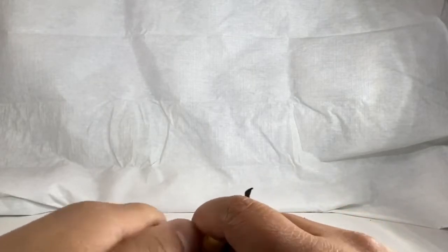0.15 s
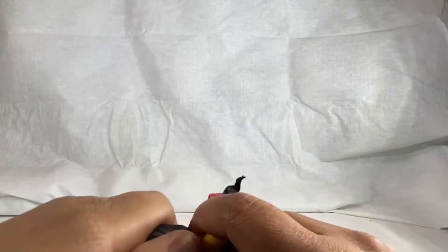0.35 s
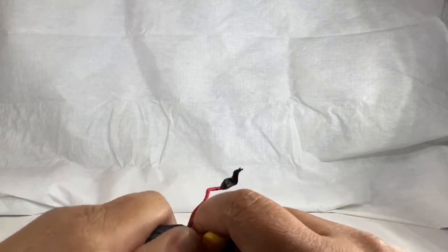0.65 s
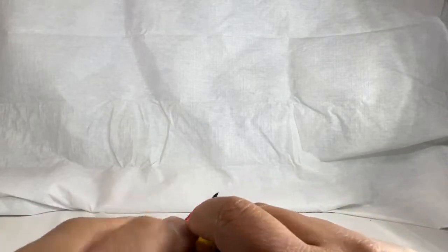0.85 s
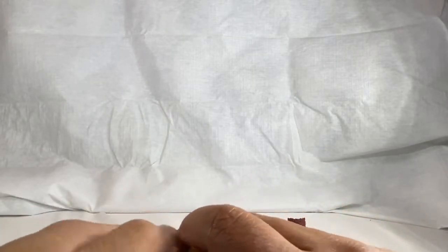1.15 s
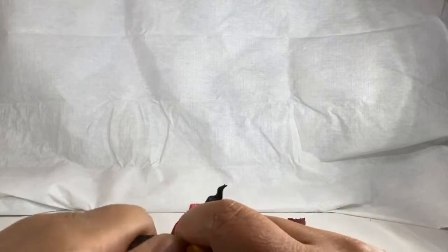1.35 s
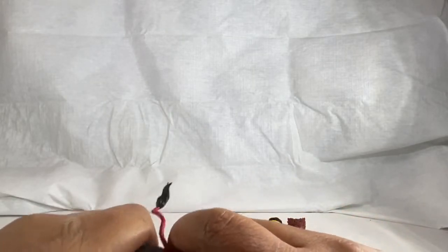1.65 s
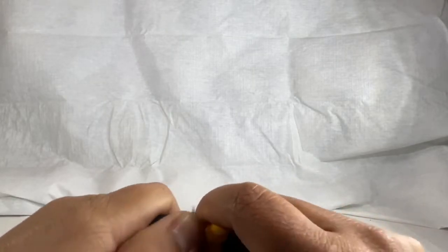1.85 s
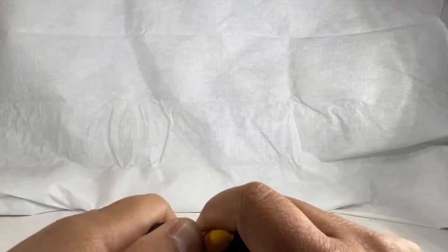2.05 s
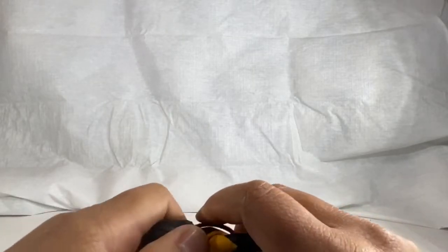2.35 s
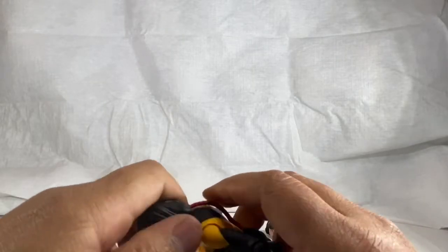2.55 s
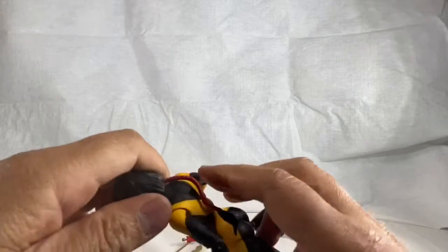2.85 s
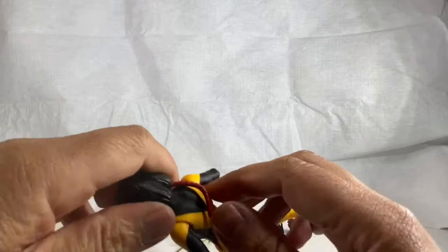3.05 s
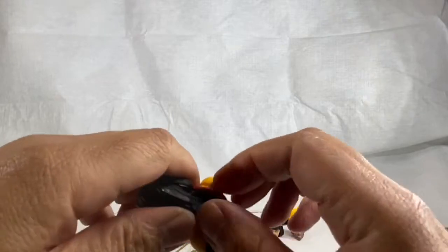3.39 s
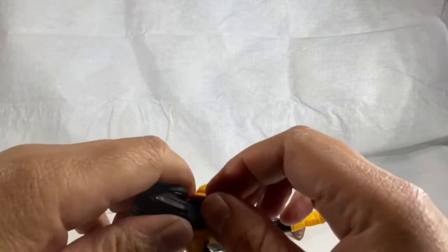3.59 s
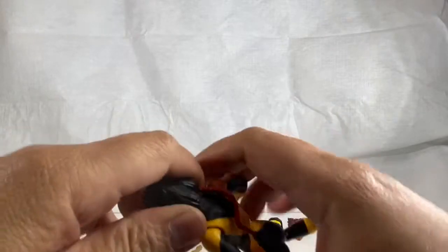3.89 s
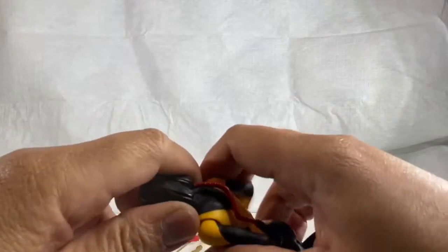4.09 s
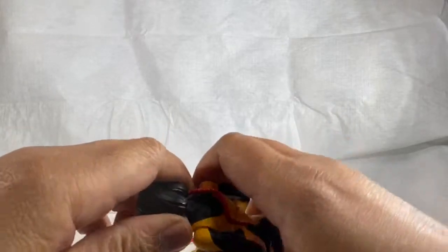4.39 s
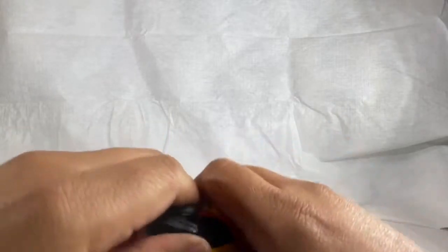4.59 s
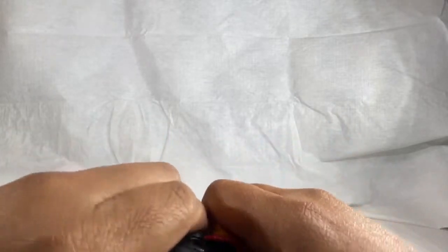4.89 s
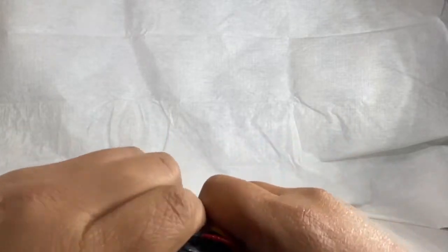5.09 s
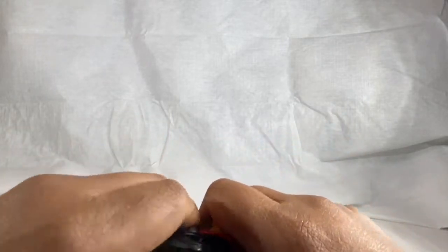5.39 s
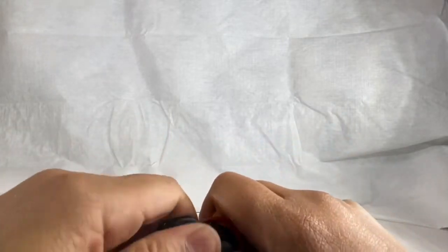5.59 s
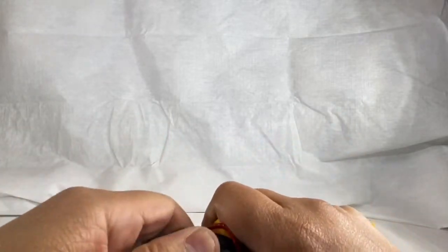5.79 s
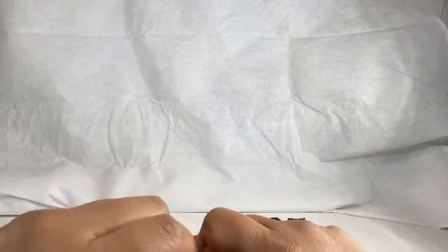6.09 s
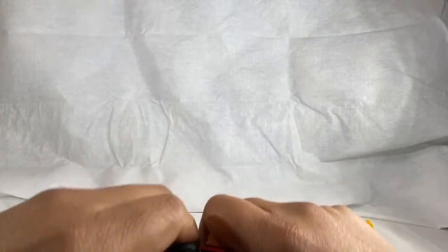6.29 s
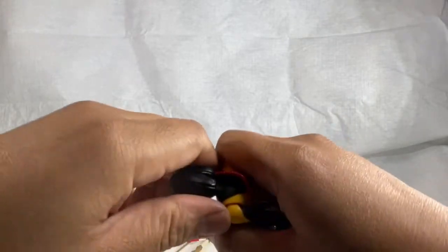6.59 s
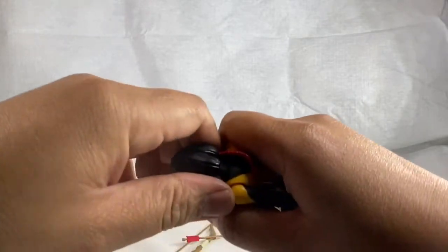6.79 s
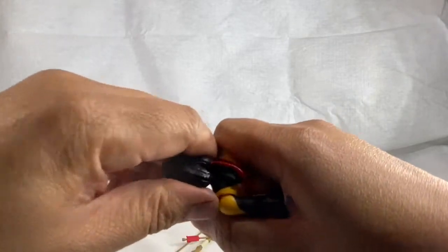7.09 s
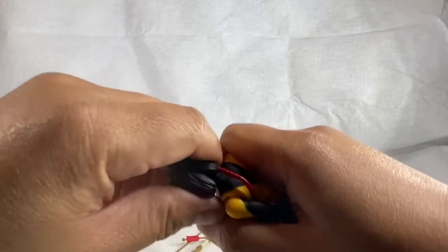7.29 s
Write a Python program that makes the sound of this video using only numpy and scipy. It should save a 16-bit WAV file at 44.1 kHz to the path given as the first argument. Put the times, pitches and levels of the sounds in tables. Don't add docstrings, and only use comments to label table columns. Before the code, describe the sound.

Dry plastic snaps and tiny ticks from a small jointed figure being worked by hand, two dull knocks, one very loud crack, faint indoor hum.

```python
import sys
import numpy as np
from scipy import signal
from scipy.fft import rfft, irfft
from scipy.io import wavfile
from scipy.ndimage import uniform_filter1d

SR = 44100
rng = np.random.default_rng(int(sys.argv[2]) if len(sys.argv) > 2 else 0)


def boost(x):
    u = np.asarray(x, float) / 20
    return 10 ** u


def to_wav(sig):
    pcm = np.clip(np.atleast_2d(sig), -1, 1) * 32767
    pcm = np.round(pcm).astype(np.int16)
    wavfile.write(sys.argv[1], SR, pcm.T)


N = 328545

# frequency in Hz, level in dB per Hz.
HUM_SPECTRUM = [(15, -58), (25, -24), (49, -5), (90, -3.5), (121, -7), (197, -4), (259, -7), (339, -3.5),
                (410, -8), (687, -11.5), (1510, -17), (10700, -29), (16500, -45)]
HUM_DB = -65.5
# time in seconds, level in dB.
MURMUR_SWELL = [(0.0, -72), (3.11, -82), (6.12, -67), (6.49, -86), (7.45, -79)]
MAINS_HZ, MAINS_DB = 58.4, -79.5

# peak time in seconds, half length in seconds,
# rub through the shell in dB, dry skin hiss in dB.
STROKES = [(0.064, 0.069, -56.5, -66), (.25, 0.034, -72, -74), (0.344, 0.031, -59, -71),
           (.40, 0.027, -69, -73), (0.883, .2, -65, -72), (1.13, 0.036, -55, -82), (1.206, .06, -58, -70),
           (2.427, .07, -69, -67), (2.543, 0.11, -73.5, -63.5), (2.682, 0.064, -66.5, -66),
           (2.744, 0.063, -60.5, -68.5), (2.809, 0.022, -56.5, -64), (2.971, 0.022, -73, -70),
           (3.018, 0.026, -63.5, -62), (3.131, 0.086, -62.5, -65.5), (3.246, 0.04, -74, -63),
           (3.39, 0.092, -64, -68), (3.487, 0.034, -67.5, -59.5), (3.585, 0.079, -80.5, -68.5),
           (3.805, 0.087, -63, -64), (3.97, 0.16, -66.5, -63.5), (4.072, 0.024, -67, -59),
           (4.235, 0.054, -65, -59), (4.38, 0.072, -57.5, -63), (4.465, .1, -60, -58),
           (4.878, 0.13, -64, -66), (5.014, 0.094, -62, -66.5), (5.293, 0.13, -62.5, -72),
           (5.961, 0.071, -67, -71.5), (6.252, 0.13, -70, -66.5)]
STROKE_FALL_DB = 19.5
# time in seconds, rub level in dB.
PRESSURE = [(0, -75.5), (.2, -61.5), (.45, -78), (.59, -95), (.66, -69), (1.07, -72), (1.3, -66),
            (1.67, -85), (1.75, -72.5), (1.91, -72), (1.97, -80), (2.32, -74.5), (5.2, -82), (5.53, -71),
            (6.76, -86), (6.81, -67.5), (6.95, -79), (7.45, -87)]
SKIN_DB, SKIN_SHARE = -77, 0.4
# frequency in Hz, level in dB.
SKIN_SPECTRUM = [(1200, -17), (3000, -0.5), (7000, 1.5), (10000, 1), (14000, -1), (16500, -10.5)]
# time in seconds, frequency in Hz.
GRIP = [(.05, 2796), (.3, 3700), (1.15, 3700), (2.3, 5330), (2.7, 4005), (2.82, 5700), (3.1, 4670),
        (3.4, 4480), (3.8, 3430), (4.4, 5700), (4.9, 5300), (5.3, 3130), (5.9, 3960), (6.8, 4715),
        (7.45, 4710)]

# frequency in Hz, width in Hz, level in dB.
SHELL_MODES = [(1300, 630, -10.5), (2730, 1600, 2.5), (3700, 570, 3), (4680, 1100, 2.5), (5700, 740, 4),
               (6960, 1300, -9.5)]
# start in seconds, peak
# in dB, ring in Hz, snap in dB.
TICKS = [(0.042, -41.5, 2820, -18), (0.149, -30, 5020, 0), (0.1883, -42, 5640, -10), (0.21, -47, 2430, -8),
         (0.3409, -36, 3790, -9), (0.4238, -46, 3670, -6), (0.4363, -43, 6450, -10),
         (0.46, -35.5, 3850, -2), (0.5213, -48.5, 2370, -6), (0.528, -44, 6360, -1),
         (0.863, -48.5, 5510, -5), (0.9844, -47, 3500, -27), (1.2815, -48, 3770, -16),
         (1.3917, -55, 6160, -1), (1.4494, -47, 8570, 3), (1.6534, -49.5, 2460, 1),
         (1.7375, -34.5, 2810, 8.5), (2.0283, -35, 5800, -4), (2.0949, -48.5, 4114, 15),
         (2.7511, -50, 4950, -7), (3.9524, -43.5, 6100, 5), (4.0804, -43, 3540, -27),
         (4.9015, -50.5, 5450, -5), (5.105, -55, 4230, -10.5), (5.8244, -45.5, 4820, -1),
         (5.8534, -36, 5600, -3), (5.8942, -33.5, 5470, -22), (5.4562, -49.5, 5490, -19.5),
         (6.304, -52, 3790, 3), (7.0937, -37, 3250, -5)]
PEG_HZ, BALL_HZ, SOCKET_HZ = 13850, 9570, 7900
PEG_SLIPS = [(0.0995, -14.5, 5570, -7, -3.5), (0.1378, -16, 5460, -10.5, -6.5),
             (0.3876, -36.5, 6280, -14, -17.5), (0.4472, -22.5, 6000, -19.5, -8.5),
             (0.992, -26, 5840, -17, -2), (1.02, -31, 3660, -12, -13.5), (1.2043, -20, 6000, -11, 2.5),
             (1.2221, -20, 5500, -6.5, -7.5), (1.3028, -12.5, 5430, -13, -5),
             (1.4128, -43.5, 3790, -29, -27.5), (1.8464, -27, 6120, -16, -2.5),
             (1.903, -35.5, 4140, -24, -9.5), (1.9797, -24, 5400, -9, -13), (3.9202, -35.5, 5130, -5, 1.5),
             (5.8824, -33, 3100, -4.5, -13.5), (5.9152, -37, 4870, 1, -6.5),
             (5.9893, -37.5, 2896, -7, -3.5), (7.051, -18, 4740, -9.5, -19.5)]
BALL_SLIPS = [(0.157, -22, 2780, -17, -1), (0.2311, -34.5, 3700, -21, 4), (0.3766, -35, 3900, 5, -2),
              (0.3935, -29.5, 3870, 5, 2.5), (0.4435, -17.5, 7040, 4.5, 11), (1.2257, -17.5, 2760, -17, 6),
              (1.2916, -30, 2820, -9, 0), (1.2963, -34, 7130, -1, 2), (1.3115, -31.5, 3810, -5, 6),
              (1.4429, -18.5, 6600, -13.5, 1.5), (1.488, -23.5, 4350, -13, 2.5),
              (1.567, -18.5, 6760, -9, 1.5), (1.5701, -35, 4780, -16, -8), (2.0391, -30.5, 5370, 1.5, -2.5),
              (2.1743, -27.5, 2950, -8, -8.5), (2.442, -22, 5230, -13, -14.5),
              (3.322, -23.5, 4380, -8.5, -8.5), (5.4394, -32.5, 6180, -2, -1),
              (5.5397, -22, 5260, -14, -13), (5.5449, -10.5, 5010, -18, -12.5), (5.5646, -1, 3530, -7, -9),
              (5.573, -36, 3420, -11.5, -20), (5.6134, -31.5, 3040, -6.5, -10.5),
              (7.102, -11, 4480, -11, -16)]
SOCKET_SLIPS = [(0.3279, -28.5, 3720, 1, 4), (0.3496, -37.5, 3850, 3, -19), (0.4518, -28.5, 6500, -2, -13),
                (0.9047, -10, 3550, -26, -21), (1.085, -39, 3550, -14, -40),
                (1.8799, -38.5, 5930, -18, -10), (2.559, -30.5, 4830, -10.5, -2.5),
                (3.0567, -36, 6120, -3, 0), (3.2526, -29.5, 5160, -6, -5.5), (3.985, -37.5, 3680, -2, -3),
                (5.7988, -36.5, 6050, -3.5, -4.5), (5.8366, -14.5, 5650, -14, -9),
                (5.8742, -27.5, 3700, -14, -23), (6.312, -27, 3534, -8.5, -7),
                (7.3716, -24.5, 4650, -7, -12), (7.431, -38, 4520, -5, -28)]
# start in seconds, peak in dB, ring in Hz.
PARTNERS = [
    (0.904, -19.5, 5850),
    (5.5643, -9.5, 4950),
    (5.8361, -23, 4050),
    (7.1036, -20.5, 2920),
    (0.9045, -26, 7000),
]
# start in seconds, end in seconds, gap in seconds,
# peak in dB, ring in Hz.
CREAKS = [(.2506, .28, .0094, -46, 3720), (.9625, .98, .0157, -53, 4300), (1.1181, 1.133, .006, -47, 3400),
          (1.512, 1.519, .005, -49, 6600), (1.5754, 1.588, .0053, -38, 5300),
          (1.7523, 1.78, .0192, -53.5, 3400), (4.8315, 4.865, .0153, -50, 5330),
          (5.4855, 5.53, .0195, -52, 5200), (5.9857, 5.998, .0085, -41, 4550),
          (5.9202, 5.95, 0.022, -48, 4100), (.2985, .32, 0.0051, -58, 3000),
          (5.3, 5.78, .0165, -59.5, 3100), (5.3665, 4.8, 0.036, -51.5, 4000),
          (4.98, 4.995, .0125, -50, 5250), (.3717, .373, .01, -42, 9600)]
CREAK_FADE_DB, CREAK_SNAP_DB = -0.4, -14
CREAK_SPREAD_DB = -1
FINGER_S, FINGER_SHARE = 0.00065, 0.42

# start in seconds, peak in dB, ring in Hz.
THUDS = [(0.0996, -33, 1260), (0.139, -35.5, 1320), (0.9043, -26.5, 982), (1.2226, -41.5, 1230),
         (1.228, -49, 1270), (1.2943, -39, 1325), (5.5645, -18, 900), (5.576, -43, 1420),
         (5.8739, -33.5, 734), (5.9889, -45, 975), (7.1014, -28, 780), (7.373, -44.5, 1710)]
# start in
# seconds, # peak in dB, ring in Hz.
PADS = [
    (1.197, -54, 110),
    (5.399, -51, 900),
    (2.817, -62, 850),
    (.268, -54, 750),
    (5.568, -51, 120),
    (7.107, -48, 170),
]

# start in seconds, peak in dB, ring in Hz, rattle in dB.
KNOCKS = [
    (1.9965, -20, 937, -28),
    (2.1053, -16.5, 1240, -29.5),
    (2.1325, -55, 1300, -41),
]
# frequency in Hz, level in dB.
TABLE_SPECTRUM = [(80, -14), (200, -7), (500, -7.5), (1000, -7.5), (2300, -15.5), (4000, -29.5),
                  (8000, -44)]

# frequency in Hz, time to fall 60 dB in seconds.
ROOM_T60 = [(800, 0.27), (2000, 0.17), (5500, 0.16), (12000, 0.17)]


def evened(x):
    return x / np.sqrt(np.mean(x ** 2) + 1e-20)


def read(points, hz):
    f, value = np.transpose(points)
    return np.interp(np.log(hz + 1), np.log(f + 1), value)


def over_time(rows):
    s, *columns = np.transpose(rows)
    return [np.interp(np.arange(N) / SR, s, column) for column in columns]


def add(mix, s, sound):
    part = mix[round(s * SR):][:len(sound)]
    part += sound[:len(part)]


def peak(hz, centre_hz, width, db):
    return boost(2 * db) / (1 + (2 * (hz - centre_hz) / width) ** 2)


def causal(power):
    cepstrum = irfft(np.log(power + 1e-9) / 2)
    middle = cepstrum.shape[1] // 2
    cepstrum[:, 1:middle] *= 2
    cepstrum[:, middle + 1:] = 0
    return np.exp(rfft(cepstrum))


def noise(gain, patchy_db, size=256):
    hop = size // 4
    frames, hz = N // hop + 5, np.fft.rfftfreq(size, 1 / SR)
    real, imaginary, patches = rng.standard_normal((frames, len(hz), 3)).T
    patches = uniform_filter1d(patches, size=5, axis=0)
    patches = evened(uniform_filter1d(patches, size=24, axis=1))
    colour = gain(hz[:, None], np.arange(frames) * hop / SR)
    spectra = (real + 1j * imaginary) * colour * boost(patchy_db * patches)
    return evened(signal.istft(spectra, nperseg=size, noverlap=size - hop)[1][:N])


def hum():
    swell_db, = over_time(MURMUR_SWELL)

    def hiss_gain(hz, s):
        return boost(read(HUM_SPECTRUM, hz))

    def murmur_gain(hz, s):
        return hiss_gain(hz, s) * (hz < 500) * (hz > 230)

    murmur = noise(murmur_gain, patchy_db=1.0, size=2048)
    hiss = noise(hiss_gain, patchy_db=-1.03, size=2048)
    drift = uniform_filter1d(uniform_filter1d(rng.standard_normal(N), size=9000), size=9000)
    waver = 1 + 0.37 * evened(drift)
    mains = boost(MAINS_DB) * waver * np.sin(2 * np.pi * MAINS_HZ * np.arange(N) / SR)
    return boost(HUM_DB - 3.0) * hiss + boost(swell_db - 1.5) * murmur + mains


def sliding():
    pressure_db, = over_time(PRESSURE)
    steady_hiss_db = SKIN_DB + SKIN_SHARE * (pressure_db + 75)
    power = boost(2 * np.array([pressure_db, steady_hiss_db]))
    for s, half, rub_db, hiss_db in STROKES:
        span = slice(max(round((s - 2 * half) * SR), 0), round((s + 2 * half) * SR))
        fall_db = STROKE_FALL_DB * abs(np.arange(N)[span] / SR - s) / half
        power[:, span] += boost(2 * (np.array([[rub_db], [hiss_db]]) - fall_db))
    return np.sqrt(power)


def fingers():
    rub_level, hiss_level = sliding()

    def shell_gain(hz, s):
        gripped = (np.interp(s, *np.transpose(GRIP)), 700, 12)
        return np.sqrt(sum(peak(hz, *mode) for mode in [gripped] + SHELL_MODES))

    def skin_gain(hz, s):
        return boost(read(SKIN_SPECTRUM, hz))

    roughness = evened(uniform_filter1d(rng.standard_normal(N), size=60))
    grain = evened(boost(2.2 * roughness))
    rub = boost(-2.5) * noise(shell_gain, patchy_db=1.3) * rub_level
    hiss = noise(skin_gain, patchy_db=3.0) * hiss_level
    return grain * (rub + hiss)


def slips():
    rows = []
    for seat, seat_hz in [(PEG_SLIPS, PEG_HZ), (BALL_SLIPS, BALL_HZ), (SOCKET_SLIPS, SOCKET_HZ)]:
        rows += [(s, db, hz, shell_db, seat_hz, snap_db) for s, db, hz, shell_db, snap_db in seat]
    rows += [(s, db, hz, -20, 9500, -40) for s, db, hz in PARTNERS]
    stutter = []
    for start, end, gap, db, hz in CREAKS:
        for k, s in enumerate(np.arange(start, end, gap)):
            tick_db = db + CREAK_FADE_DB * k + CREAK_SPREAD_DB * (-1) ** k
            stutter.append((s, tick_db, hz, CREAK_SNAP_DB))
    return rows + [(s, db, hz, -7.0, BALL_HZ, snap_db - 2.5) for s, db, hz, snap_db in TICKS + stutter]


def joint():
    s, peak_db, main_hz, shell_db, snap_hz, snap_db = np.array(slips()).T[:, :, None]
    hz = np.fft.rfftfreq(1024, 1 / SR)
    radiation = hz ** 4 / (hz ** 4 + 2010.0 ** 4) / (1 + (hz / 16000) ** 30)
    shell = boost(2 * shell_db) * sum(peak(hz, *mode) for mode in SHELL_MODES)
    snap = peak(hz, snap_hz, 1700, snap_db - 1.0) + peak(hz, 9700, 5300, snap_db - 8.0)
    front = radiation * (peak(hz, main_hz, 1050, 0) ** 2 + boost(-7.0) * shell + snap)
    around = radiation * (peak(hz, main_hz, 1800, -5.0) + boost(2.5) * shell + boost(-3.0) * snap)

    luck = uniform_filter1d(rng.standard_normal((len(s), 2, len(hz))), size=24, axis=2)
    delay = 0.0003 + 0.00027 * np.tanh(evened(luck[:, 0]))
    force = np.exp(-2j * np.pi * np.cumsum(delay, axis=1) * hz[1])
    turns = np.round(main_hz * FINGER_S)
    echo = 1 + FINGER_SHARE * np.cos(2 * np.pi * turns * hz / main_hz)
    uneven = boost(5.1 * evened(luck[:, 1]))

    powers = (front * echo * uneven, around)
    clicks = np.array([irfft(causal(power) * force)[:, :700] for power in powers])
    clicks *= boost(peak_db + 4.0) / abs(clicks[0]).max(axis=1, keepdims=True)
    out = np.zeros((N, 2))
    for k, start in enumerate(s[:, 0]):
        add(out, start - 0.0002, clicks[:, k].T)
    return out.T


def pads():
    s, peak_db, pad_hz = np.array(THUDS + PADS).T[:, :, None]
    tone = np.fft.rfftfreq(4096, 1 / SR) / pad_hz
    power = peak(tone, 0.95, 0.37, 0) + peak(tone, 1.4, 0.7, -10.0) + peak(tone, 0.45, 0.21, -5.5)
    soft = tone ** 2 / (tone ** 2 + 0.05) / (1 + (tone / 1.9) ** 6)
    jolts, out = irfft(causal(power * soft)), np.zeros(N)
    for start, db, jolt in zip(s[:, 0], peak_db[:, 0], jolts):
        add(out, start, boost(db) * jolt[:3000] / abs(jolt).max())
    return out


def ring(hz, t60, rise, size=500):
    t = np.arange(size) / SR
    x = (1 - np.exp(-t / rise)) ** 2 * boost(-60 * t / t60) * np.sin(2 * np.pi * hz * t)
    return x / np.linalg.norm(x)


def table():
    out, t = np.zeros(N), np.arange(6000) / SR
    for s, peak_db, hz, rattle_db in KNOCKS:
        blow = ring(hz, 0.0028, 0.00061)
        blow += boost(-6) * ring(2.6 * hz, 0.0013, 0.00043)
        blow += boost(-15) * ring(3.6 * hz, 0.0037, 0.00044)
        rattle = rng.standard_normal(len(t)) * boost(-60 * t / 0.17) * np.minimum(t / 0.0011, 1)
        scaled_hz = np.fft.rfftfreq(len(t), 1 / SR) * 1000 / hz
        rattle = irfft(rfft(rattle) * boost(read(TABLE_SPECTRUM, scaled_hz)))
        add(out, s, boost(peak_db) * blow / abs(blow).max())
        add(out, s, boost(peak_db + rattle_db) * evened(rattle))
    return out


def room(front, around):
    taps = np.zeros(SR // 2)
    at = np.arange(120, len(taps) - 20, 20) + rng.integers(0, 20, (len(taps) - 121) // 20)
    taps[at] = rng.choice([-1., 1.], at.shape)
    hz, t, spectra = signal.stft(taps, SR, nperseg=128)
    decay = boost(-60 * t / read(ROOM_T60, hz)[:, None])
    tail = signal.istft(spectra * decay, SR, nperseg=128)[1]
    tail = boost(-19.0) * tail / np.linalg.norm(tail)
    for s, db in [(0.0012, -23), (0.0023, -24)]:
        tail[round(s * SR)] += boost(db)
    return front + signal.fftconvolve(around, tail)[:N]


def scene():
    front, around = joint() + table() + pads()
    return (room(front, around) + fingers() + hum())[None]


def low_pass(x):
    return signal.sosfilt(signal.butter(12, 17110, fs=SR, output="sos"), x)


def record(dry):
    rounded = 0.9 * np.tanh(dry / 0.9)
    bass_cut = signal.butter(4, 48, "high", fs=SR, output="sos")
    mixed = signal.sosfilt(bass_cut, rounded)
    return low_pass(mixed)


dry = scene()
out = record(dry)
to_wav(out)
```